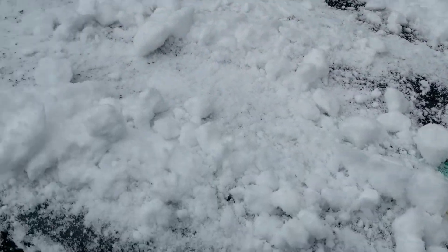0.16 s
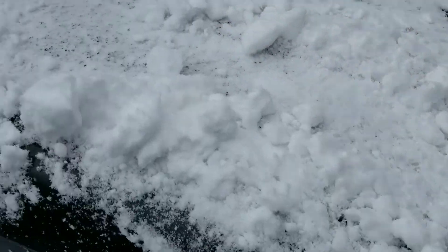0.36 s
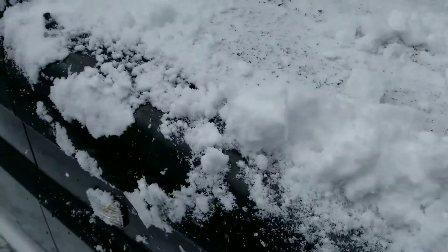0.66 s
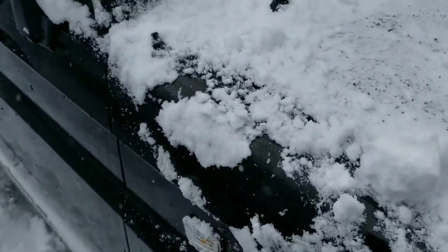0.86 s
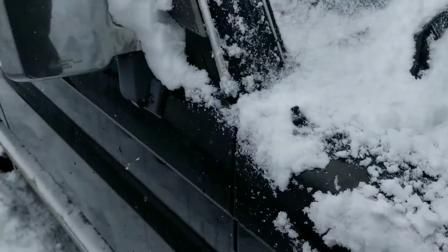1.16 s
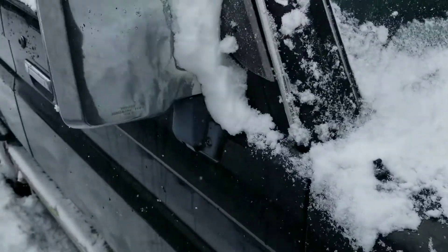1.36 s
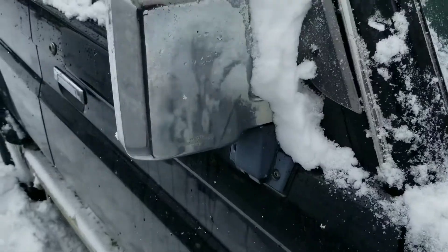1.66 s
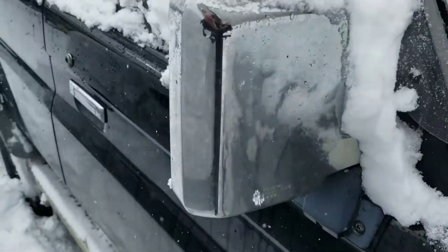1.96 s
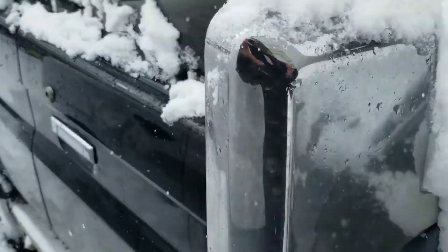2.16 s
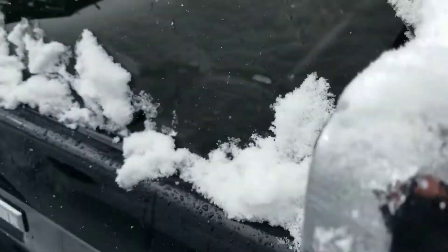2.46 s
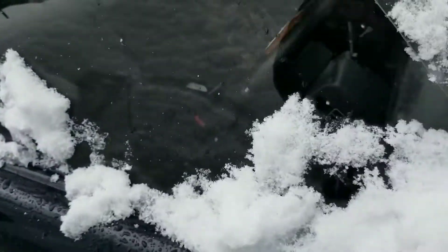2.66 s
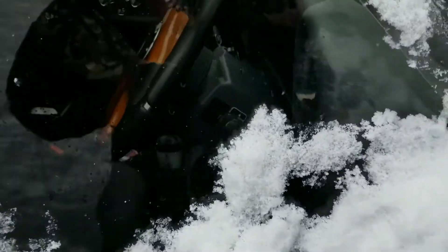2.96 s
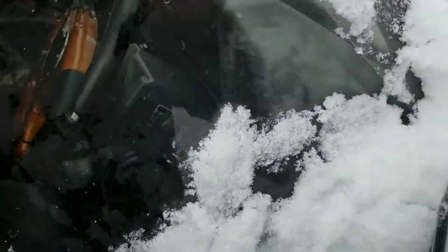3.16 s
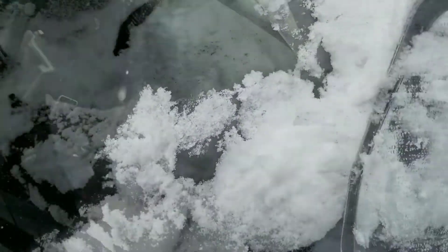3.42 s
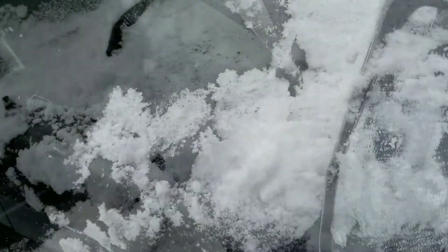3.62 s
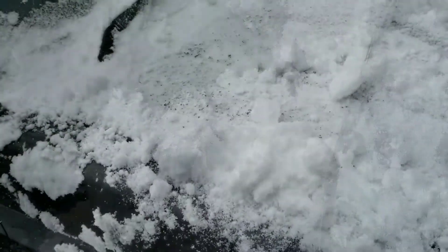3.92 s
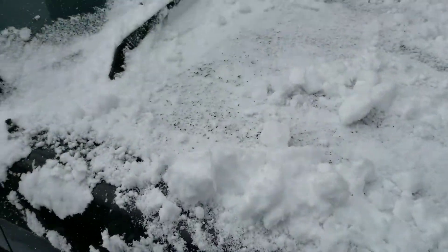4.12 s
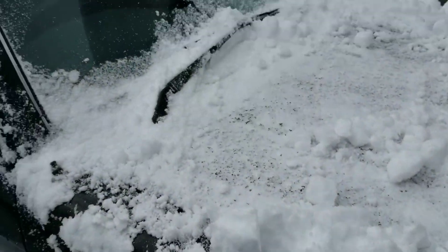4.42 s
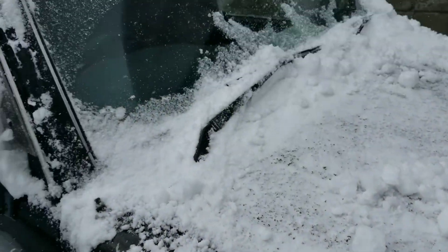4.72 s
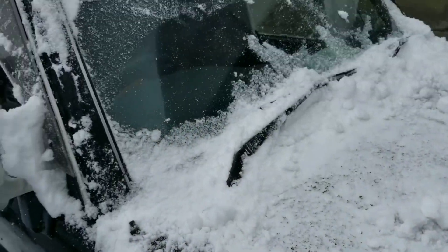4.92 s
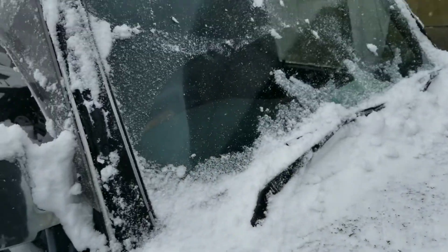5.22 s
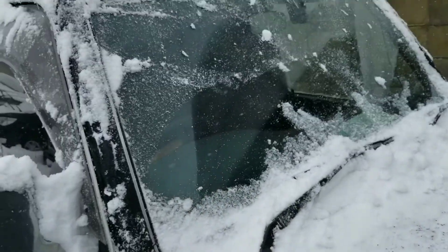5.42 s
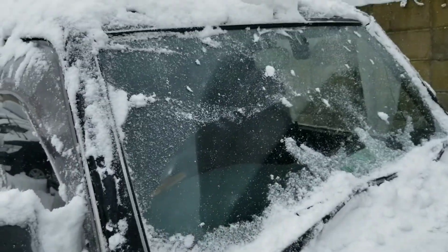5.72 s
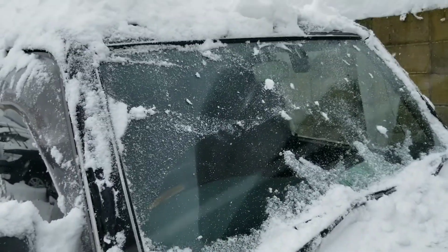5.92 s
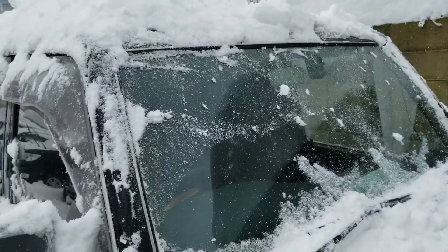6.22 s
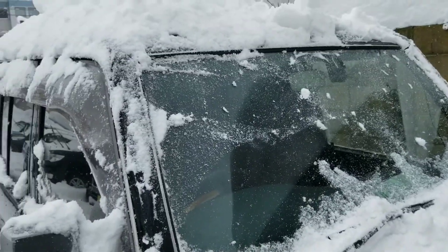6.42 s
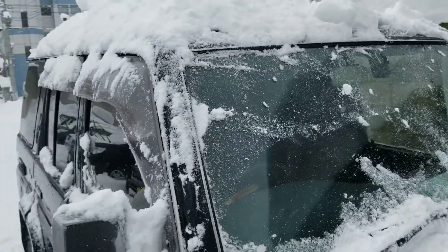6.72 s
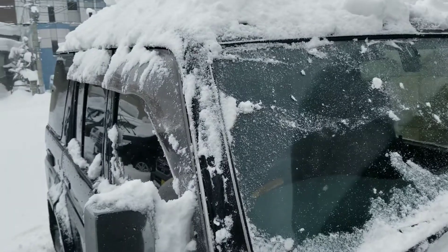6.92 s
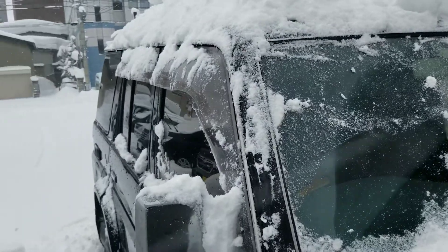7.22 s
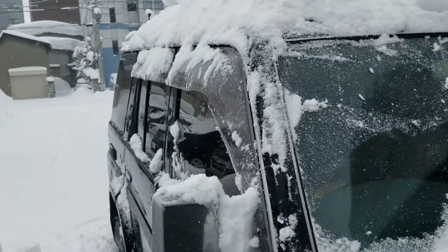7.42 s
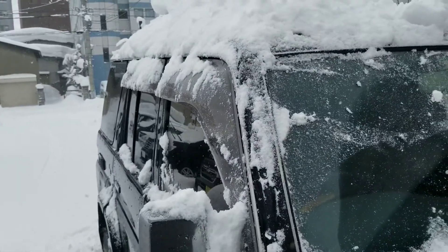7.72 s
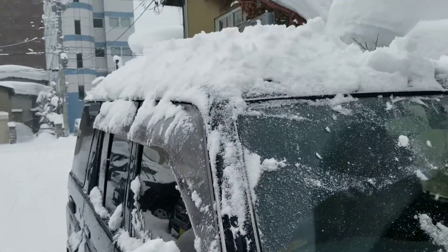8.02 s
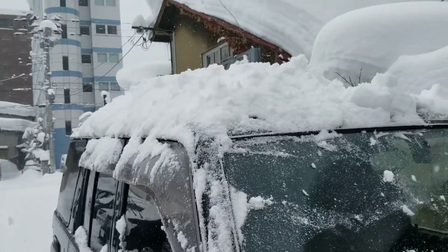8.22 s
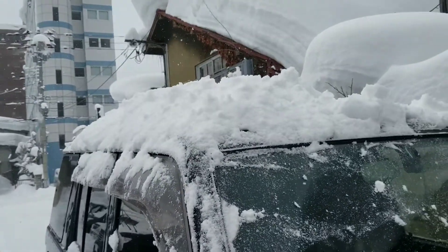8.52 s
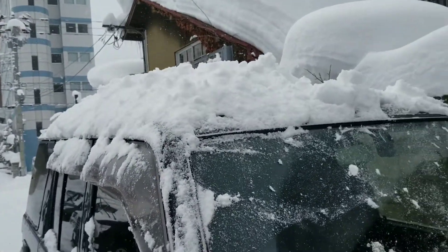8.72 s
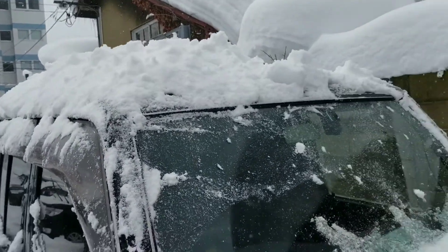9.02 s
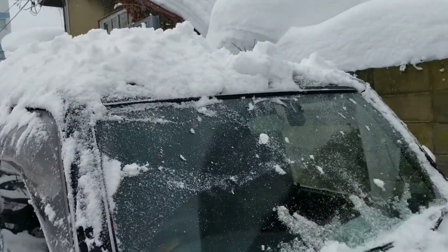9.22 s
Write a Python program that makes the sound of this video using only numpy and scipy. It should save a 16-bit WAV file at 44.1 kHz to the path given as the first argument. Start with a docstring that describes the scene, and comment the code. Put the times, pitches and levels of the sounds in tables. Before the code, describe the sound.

A four-cylinder diesel idles steadily outdoors in snow, heard through a close hand-held stereo microphone. From 0 to 1 s it is open: deep boom, about 25 firings per second, uneven metallic knocks, injector ticking and pulsing belt hiss, with small snow crunches near 0.2-0.4 s. From 1.5 to 3.5 s knock and hiss fade, leaving a blurred hollow drone; boots crunch at 2.0 s and more heavily at 3.1-3.25 s, and a sleeve swishes faintly. At 3.61 s the sound cuts for a blink, then loud finger bumps strike mainly the right until 3.8 s. Low gusts buffet both sides, dying down by 5.2 s, while the engine is muffled and its bass flutters. From 6 to 7 s it comes clear again, clattering and hissing steadily to 9.4 s with occasional harder knocks. A distant vehicle's low hum sinks in pitch, then rises around 8-9 s, beating against the boom.

```python
"""Diesel idling in deep snow

Someone walks round a four-cylinder diesel with a hand-held microphone, first along its side, then in front.
Firing harmonics make the exhaust boom, noise-rung strokes the knock, and pulsing noise the belt side's hiss.
Snow crunches as decaying rings with grit. After a short break a finger bumps the right port, gusts of
shaped noise buffet both, and the shielded engine comes clear again.
Far off, two gliding sines are the hum of another vehicle that slows and pulls away.
"""
import sys
import numpy as np
from scipy import signal
from scipy.fft import rfft, irfft, next_fast_len
from scipy.io import wavfile
from scipy.ndimage import uniform_filter1d, map_coordinates

SR = 44100
rng = np.random.default_rng(int(sys.argv[2]) if len(sys.argv) > 2 else 0)


def pcm_store(signal):
    """Save signal as 16-bit PCM."""
    levels = np.round(np.clip(np.atleast_2d(signal), -1, 1) * 32767)
    wavfile.write(sys.argv[1], SR, levels.astype(np.int16).T)


N = 413216
TIME = np.arange(N) / SR
BREAK_START, BREAK_END = 3.611, 3.632  # s
FIRING_HZ = 25.474


def from_db(db):
    """Decibels to gain."""
    return 10 ** (np.asarray(db) / 20)


def rms_one(x):
    """Scale to unit power."""
    return x / np.sqrt(np.mean(x ** 2) + 1e-20)


def in_time(rows):
    """Each column of a curve, sample by sample."""
    s, *columns = np.transpose(rows)
    return [np.interp(TIME, s, c) for c in columns]


def at_hz(points, hz):
    """Read a spectrum on a log-frequency axis."""
    f, value = np.transpose(points)
    return np.interp(np.log(np.maximum(hz, 1)), np.log(f), value)


def drift(rate):
    """Smooth random curve from knots of spread 1, with rate new knots a second."""
    knots = rng.standard_normal(2048)
    coarse = map_coordinates(knots, [TIME[::32] * rate], order=2, mode="wrap")
    return coarse.repeat(32)[:N]


def span(start, end, fade_s):
    """Gain that rises, holds at 1 from start to end, and falls."""
    outside = (TIME - np.clip(TIME, start, end)) / fade_s
    return np.exp(-np.minimum(outside ** 2, 60))


# stereo width: f/Hz, left-right likeness (1 alike, 0 unrelated, negative opposed)
LIKENESS = [(50, 0.86), (350, 0.95), (700, 0.61), (1100, 0.58), (1650, -0.84), (2200, 0.052), (3000, 0.4),
            (5000, -0.013), (15000, 0.033)]


def colour(pair, spectrum):
    """Shape two unrelated signals into stereo with the given likeness per frequency; mid rms 1."""
    size = next_fast_len(N + 4096)
    hz = np.arange(size // 2 + 1) * SR / size
    alike = np.clip(at_hz(LIKENESS, hz), -.99, .99)
    widths = [np.ones_like(hz), np.sqrt((1 - alike) / (1 + alike))]
    mid, side = irfft(rfft(pair, size) * from_db(at_hz(spectrum, hz)) * widths, size)[:, :N]
    return np.array([mid + side, mid - side]) / np.std(mid)


def swell(rows, fade_s, spectrum):
    """Coloured noise that comes and goes."""
    gain = np.sqrt(sum((from_db(db) * span(start, end, fade_s)) ** 2 for start, end, db in rows))
    return gain * colour(rng.standard_normal((2, N)), spectrum)


def thumps(rows, rise, grit_db, grit_reach):
    """Soft blows: each swells in a share of a cycle and decays 60 dB in its given cycles, with low grit."""
    out, t = np.zeros(N), TIME[:SR // 8]
    for s, db, hz, cycles in rows:
        turn = t * hz
        # grit reaches a multiple of the pitch, never above 2270 Hz
        dull = signal.butter(3, min(grit_reach * hz, 2270), fs=SR, output="sos")
        grit = from_db(grit_db) * rms_one(signal.sosfilt(dull, rng.standard_normal(len(t))))
        envelope = (1 - np.exp(-turn / rise)) ** 2 * from_db(-60 * turn / cycles)
        ring = (np.sin(2 * np.pi * turn) + grit) * envelope
        at = int(s * SR)
        out[at:at + len(t)] += from_db(db) * ring / np.abs(ring).max()
    return out


def exhaust(turn, orders, boom_db, drone_db, tone_db, middle_db=-1.0, scatter=1.09, lag=0.0903):
    """Firing harmonics: the lowest boom steadily from the pipe, higher ones waver as the body panels shake."""
    boom = from_db(boom_db) / from_db(dict(orders)[2])
    upper_power = sum(from_db(db) ** 2 for k, db in orders[8:])
    drone = from_db(drone_db + tone_db) / np.sqrt(upper_power)
    middle = np.sqrt(boom * drone) * from_db(middle_db)
    out = np.zeros(N)
    for k, db in orders:
        angle = 2 * np.pi * k * (turn - .04)
        if k <= 2:
            wave = -boom * np.sin(angle)
        else:
            level = drone if k > 8 else middle
            waver = 1 + .08 * drift(6)
            # lag in firings, scatter in radians
            wave = level * waver * np.cos(angle - 2 * np.pi * k * lag + scatter * rng.standard_normal())
        out += np.sqrt(2) * from_db(db) * wave
    return out


def pulsing(turn, depth_db, peak):
    """Gain that swells once a firing, at the given place in the cycle."""
    return rms_one(from_db(depth_db * np.cos(2 * np.pi * (turn - peak))))


def clatter(turn, cylinders_db, rise_s, t60, bed, repeat, jitter_s):
    """Each firing strikes the metal: part of the ring repeats for that cylinder, part rattles freely."""
    firing = np.floor(turn).astype(int) + 1
    age = turn % 1 / FIRING_HZ  # s since the firing
    chance = rng.standard_normal((firing.max() + 1, 2))[firing]
    cylinder = (firing - 1) % len(cylinders_db)
    strength_db = np.array(cylinders_db)[cylinder] + chance[:, 0]
    blow = from_db(strength_db - 60 * age / t60) * (1 - np.exp(-age / rise_s))
    # all cylinders share the block's ring and add a little of their own
    shared = rng.standard_normal((2, 1, 2048))
    rings = rms_one(shared + .5 * rng.standard_normal((2, len(cylinders_db), 2048)))
    place = ((age + jitter_s * chance[:, 1]) * SR).astype(int) % rings.shape[-1]
    same = rings[:, cylinder, place]
    share = np.clip(repeat, 0, 1)
    rattle = np.sqrt(share) * same + np.sqrt(1 - share) * rng.standard_normal((2, N))
    return rattle * np.hypot(rms_one(blow), bed)


def resonate(x, modes, vary_db):
    """Lift a band at each resonance; the lift drifts at the pace of the firings."""
    for hz, width, lift_db in modes:
        r = np.exp(-np.pi * width / SR)
        top = [(1 - r * r) / 2, 0, -(1 - r * r) / 2]
        bottom = [1, -2 * r * np.cos(2 * np.pi * hz / SR), r * r]
        band = signal.lfilter(top, bottom, x)
        x = x + (from_db(lift_db + vary_db * drift(FIRING_HZ)) - 1) * band
    return x


# resonances of block and covers: f/Hz, width/Hz, mean lift/dB (blows use f alone)
BLOCK_MODES = [(807, 80, 6.5), (1014, 28, 4), (1231, 37, 6), (1406, 160, 3), (1598, 130, 3.5),
               (1908, 184, 4.5), (2151, 54, 4.5), (2310, 28, 3.5), (2520, 240, 4.5)]


def ring_block(rows, rise_s, t60, spread_hz):
    """Each blow (t/s, peak/dB, f/Hz) swells into a ring of the block's modes near one pitch."""
    out, t = np.zeros((2, N + SR)), TIME[:SR // 12]
    modes = np.array(BLOCK_MODES)[:, :1]
    rings = np.sin(2 * np.pi * modes * t) * (1 - np.exp(-t / rise_s)) ** 2 * from_db(-60 * t / t60)
    for s, db, hz in rows:
        nearness = np.exp(-.5 * ((modes.T - hz) / spread_hz) ** 2)
        ring = (nearness * rng.standard_normal((2, len(modes)))) @ rings
        at = int(s * SR)
        out[:, at:at + len(t)] += from_db(db) * ring / np.abs(ring).max(axis=1, keepdims=True)
    return out[:, :N]


def pings(turn, cylinders, vary_db=1.5, wander_octaves=0.11, cover_vary_db=5.0):
    """Every ignition pings near its cylinder's pitch; the covers ring rounder after it, each time varied."""
    at = np.flatnonzero(np.diff(np.floor(turn)) > 0) + 1
    cylinder = np.floor(turn[at]).astype(int) % len(cylinders)
    db, hz, cover_db = np.array(cylinders)[cylinder].T
    chance = rng.standard_normal((len(at), 4)).T
    block_hz = hz * 2 ** (wander_octaves * chance[1])
    cover_hz = 1997 * 2 ** (wander_octaves * chance[3])
    block = zip(TIME[at], db + vary_db * chance[0], block_hz)
    covers = zip(TIME[at] + 0.001535, cover_db + cover_vary_db * chance[2], cover_hz)
    return (ring_block(block, rise_s=.0012, t60=.048, spread_hz=200),
            ring_block(covers, rise_s=.005, t60=.036, spread_hz=150))


def chuffing(turn, peak=0.14, rise_db=30, fall_db=19, bed=0.58, vary_db=3.0):
    """Hiss swells quickly towards each firing and sinks more slowly after it (dB per cycle)."""
    since = (turn - peak) % 1
    slope_db = -np.minimum(fall_db * since, rise_db * (1 - since))
    swelling = from_db(slope_db + vary_db * np.tanh(drift(FIRING_HZ)))
    return rng.standard_normal((2, N)) * np.hypot(bed, swelling)


# dull knock of the sump: f/Hz, relative level per Hz/dB
SUMP = [(350, -21), (560, 2.5), (690, -0.5), (820, -1), (920, -1.5), (1040, 3), (1150, -3.5), (1500, -35)]
# knock of the block: f/Hz, relative level per Hz/dB
KNOCK = [(500, 2.5), (800, -0.5), (1030, -5), (1140, -4.5), (1300, 3), (1450, 6), (1650, -7), (1900, -24),
         (3000, -30)]
# clatter of the injectors: f/Hz, relative level per Hz/dB
INJECTORS = [(1200, -40), (1700, -4), (1950, 0.5), (2300, 2), (2550, -0.5), (2750, -3.5), (3200, -8.5),
             (4200, -11.5), (6000, -29)]
# belt and intake hiss: f/Hz, relative level per Hz/dB
HISS = [(1760, -1), (3000, -0.5), (3870, -5), (4720, -3.5), (6610, -8), (8120, -6), (8880, -8.5),
        (10300, -8), (12500, -7.5), (14100, -11.5), (14900, -9), (15500, -18)]
# resonances in the hiss: f/Hz, width/Hz, mean lift/dB
PULLEY_MODES = [(5100, 810, 0), (8000, 330, 0), (10600, 85, 5)]


def engine(start_turn, levels, wash, orders, cylinders_db, cylinder_pings, rumble_colour,
           tone_db, rumble_db, sump_db, knock_db, ping_db, cover_db, tick_db, air_db):
    """The idling engine from one side of the car: every layer follows one firing clock."""
    turn = FIRING_HZ * TIME + start_turn + .003 * drift(5)
    boom_db, drone_db, block_db, injector_db, hiss_db = levels
    # out of sight of the engine the clean hum fades faster than the rumble
    hum_db = drone_db + 0.44 * (drone_db + 34.5)
    tones = exhaust(turn, orders, boom_db, hum_db, tone_db)
    rumble_noise = rng.standard_normal((2, N)) * pulsing(turn, depth_db=4.5, peak=0.21)
    rumble = colour(rumble_noise, rumble_colour)
    knock = clatter(turn, cylinders_db, rise_s=.005, t60=.1, bed=wash, repeat=.45, jitter_s=.00015)
    ticks = clatter(turn, np.multiply(cylinders_db, .5), rise_s=0.0028, t60=0.095, bed=wash,
                    repeat=0.35, jitter_s=0.0002)
    # the dose of fuel wanders from stroke to stroke
    ticks = ticks * from_db(1.4 * drift(14))
    knock, ticks = [resonate(part, BLOCK_MODES, vary_db=2.5) for part in (knock, ticks)]
    hiss = resonate(chuffing(turn), PULLEY_MODES, vary_db=2.5)
    ping, covers = pings(turn, cylinder_pings)
    # the sump is heard from under the car like the drone; block and injectors need a clearer path
    under_car = from_db(rumble_db) * rumble + from_db(sump_db) * colour(knock, SUMP)
    return (tones + from_db(drone_db) * under_car
            + from_db(block_db + knock_db) * colour(knock, KNOCK)
            + from_db(block_db + ping_db) * ping
            + from_db(injector_db + cover_db) * covers
            + from_db(injector_db + tick_db) * colour(ticks, INJECTORS)
            + from_db(hiss_db + air_db) * colour(hiss, HISS))


def heard(parts, name, walk_db):
    """Level in dB of one part of the engine's sound along the walk."""
    open_db, follows = parts[name]
    return open_db + follows * walk_db


# the engine bay drops out of view: t/s, treble curve level/dB, knock curve level/dB
SIDE_WALK = [(0.1, -0.5, 1.5), (0.3, -0.5, -1.5), (0.9, -0.3, -0.5), (1.7, -2, -5), (2.3, -1.5, -7.5),
             (2.8, -2.5, -13), (3.6, -0.94, -8.5)]
# engine parts by name: level in the open/dB, dB gained per dB of the walk curve
SIDE_PARTS = {"boom": (-27.5, 0.039), "drone": (-36.5, 0.38), "block": (-41.5, 1.64),
              "injectors": (-49.5, 3.57), "hiss": (-54.5, 2.26)}
# engine orders: multiple of the firing rate, relative level/dB
SIDE_ORDERS = [(1, -10.5), (2, 0.5), (3, -11.5), (4, -10), (5, -14), (6, -20), (7, -16), (8, -24.5),
               (9, -23.5), (10, -23), (11, -34), (12, -20), (13, -25.5), (14, -25), (15, -17), (16, -25),
               (17, -32), (18, -32), (19, -30.5), (20, -22), (21, -35), (22, -30), (23, -33.5), (24, -36),
               (25, -36.5), (28, -35), (31, -31)]
# cylinder strengths in firing order: relative level/dB
SIDE_CYLINDERS = [4.1, 5.3, 1.5, 4.8]
# ignition pings in firing order: relative level/dB, main f/Hz, relative level of the covers' ring/dB
SIDE_PINGS = [(-13, 1230, -7.5), (-3, 1100, -2), (-3, 1650, 1), (-1.5, 1420, -5)]
# rough part of the drone: f/Hz, relative level per Hz/dB
SIDE_RUMBLE = [(20, -26), (41, -10), (70, -5), (110, -5.5), (227, -14.5), (382, -17.5), (449, -25.5),
               (495, -20.5), (700, -34.5), (910, -62), (1540, -120)]


def engine_beside():
    """Along the side the boom holds steady while knock and hiss fade and the clatter blurs."""
    treble_db, knock_db = in_time(SIDE_WALK)
    levels = ([heard(SIDE_PARTS, name, knock_db) for name in ("boom", "drone", "block")]
              + [heard(SIDE_PARTS, name, treble_db) for name in ("injectors", "hiss")])
    # the even wash from under the car grows as the block drops out of view
    wash = 0.42 - 0.05 * knock_db
    return engine(.2, levels, wash, SIDE_ORDERS, SIDE_CYLINDERS, SIDE_PINGS, SIDE_RUMBLE,
                  tone_db=-5.0, rumble_db=3.5, sump_db=-11.0, knock_db=-5.0, ping_db=3.5,
                  cover_db=7.0, tick_db=1.0, air_db=3.5)


# the engine is shielded at first, then comes clear: t/s, openness level/dB
FRONT_WALK = [(4.2, -10.5), (4.9, -12), (5.35, -9.5), (6.0, -10), (6.3, -4), (6.9, -0.2), (8.2, 0.5),
              (9.37, 1)]
# engine parts by name: level in the open/dB, dB gained per dB of openness
FRONT_PARTS = {"boom": (-29.5, 0.77), "drone": (-41, 0.92), "block": (-49, 1), "injectors": (-52, 1.0),
               "hiss": (-56.5, 1.0)}
# engine orders: multiple of the firing rate, relative level/dB
FRONT_ORDERS = [(1, -15.5), (2, -5.5), (3, -12.5), (4, -11), (5, -15), (6, -18.5), (7, -16), (8, -27),
                (9, -18), (10, -17.5), (11, -29), (12, -17), (14, -22.5), (15, -17), (16, -30), (17, -30.5),
                (19, -17), (20, -14), (21, -51), (22, -28), (23, -26), (24, -24.5), (25, -61), (26, -41),
                (28, -35), (29, -38), (30, -29), (31, -27.5), (32, -36)]
# cylinder strengths in firing order: relative level/dB
FRONT_CYLINDERS = [6, 6.5, 7.5, 8]
# ignition pings in firing order: relative level/dB, main f/Hz, relative level of the covers' ring/dB
FRONT_PINGS = [(0.56, 1600, 0), (0.35, 1530, -4.5), (3.9, 1370, -13.5), (0.5, 1170, -5.5)]
# rough part of the drone: f/Hz, relative level per Hz/dB
FRONT_RUMBLE = [(41, -16), (70, -8.5), (182, -13.5), (206, -20.5), (378, -12.5), (449, -21), (495, -17),
                (700, -33.5), (910, -71), (1540, -120)]
# depth in the open, added depth per dB of shielding, changes per second
FLUTTER_DB, FLUTTER_GROWTH, FLUTTER_PER_S = 0.9, 0.14, 14
BOOM_GROWTH_DB_PER_S = 1.4


def engine_in_front():
    """In front every part follows the openness, the pings less than the block, and the boom flutters."""
    open_db, = in_time(FRONT_WALK)
    names = ("boom", "drone", "block", "injectors", "hiss")
    boom_db, *others = [heard(FRONT_PARTS, name, open_db) for name in names]
    flutter_db = (FLUTTER_DB - FLUTTER_GROWTH * open_db) * drift(FLUTTER_PER_S)
    # the boom also grows steadily as the microphone comes round the bonnet
    boom_db = boom_db + flutter_db - BOOM_GROWTH_DB_PER_S * (TIME[-1] - TIME)
    return engine(-.31, [boom_db, *others], 0.52, FRONT_ORDERS, FRONT_CYLINDERS, FRONT_PINGS, FRONT_RUMBLE,
                  tone_db=-0.5, rumble_db=1.0, sump_db=-9.5, knock_db=-4.0, ping_db=4.5 - 0.1 * open_db,
                  cover_db=10.5, tick_db=-2.0, air_db=3.0)


# firings that knock harder: t/s, peak level/dB, main f/Hz
HARD_KNOCKS = [(0.0317, -30, 1335), (0.188, -27.5, 1370), (0.2677, -29, 1480), (0.345, -33, 1320),
               (0.4239, -36, 1410), (0.5027, -30.5, 1465), (0.5806, -32, 1430), (0.66, -33, 1420),
               (0.7384, -35, 1240), (0.7785, -29, 1240), (0.8959, -33, 2300), (0.935, -33, 1340),
               (1.13, -42, 1610), (1.287, -40, 1370), (2.236, -36.5, 1940), (2.431, -37, 1980),
               (3.055, -37, 1980), (3.254, -56, 2050), (3.53, -41, 1960), (3.899, -40, 1410),
               (4.017, -45, 1400), (4.333, -41, 1400), (4.45, -50, 1512), (4.7235, -43, 1630),
               (5.081, -41.5, 1980), (5.1956, -41, 1940), (5.547, -47, 1490), (5.704, -46, 1490),
               (6.529, -40, 1400), (6.7645, -31, 1960), (7.435, -36, 1590), (8.18, -43, 1930),
               (8.336, -33, 1910), (8.8456, -30.5, 1900), (9.002, -36, 1570), (9.1983, -32, 1215)]


def hard_knocks():
    """Single harder blows ring the block's modes close to one pitch."""
    return ring_block(HARD_KNOCKS, rise_s=.0012, t60=.048, spread_hz=106)


# the drone swells at one pitch: start t/s, end t/s, f/Hz, level/dB
HUM_SWELLS = [(7.031, 7.108, 276, -44), (7.35, 7.419, 378, -47.5), (7.6, 7.72, 372, -46.5)]


def hum_swells():
    """Single low tones rise out of the drone and sink back."""
    return sum(np.sqrt(2) * from_db(db) * span(start, end, fade_s=0.046) * np.sin(2 * np.pi * hz * TIME)
               for start, end, hz, db in HUM_SWELLS)


# passing the hollow by the door: start t/s, end t/s, level/dB
HOLLOW = [(2.1, 3.45, -40)]
# its spectrum: f/Hz, relative level per Hz/dB
HOLLOW_COLOUR = [(100, -54), (200, -10), (275, 3), (340, -3.5), (480, -13.5), (900, -35), (1800, -34),
                 (2400, -36), (2800, -47), (4000, -44)]


def door_hollow():
    """Engine noise gathers in the hollow by the door as the microphone passes: a swell of shaped noise."""
    return swell(HOLLOW, 0.25, HOLLOW_COLOUR)


# packed snow giving under a boot: t/s, peak level/dB, ring f/Hz, cycles to fall 60 dB
STEPS = [(0.203, -24, 172, 26), (0.225, -23.5, 335, 28), (0.389, -26, 318, 3), (2.0148, -24, 790, 7.5),
         (2.0152, -40, 1740, 8), (2.0432, -25.5, 740, 4.5), (2.0487, -37, 720, 6), (2.0555, -32, 760, 6.5),
         (2.078, -32, 860, 6), (2.082, -40, 2250, 18), (2.0855, -31, 740, 4.5), (2.092, -34, 260, 4),
         (2.458, -28, 2290, 3.4), (2.855, -27, 254, 2.3), (3.077, -25, 270, 3.4), (3.1105, -23.5, 775, 3),
         (3.113, -20, 296, 3.9), (3.141, -19.5, 243, 5.2), (3.1445, -28, 520, 3.6), (3.2055, -18, 227, 2),
         (3.23, -17.5, 184, 2.8), (3.24, -16.5, 150, 2.8)]
# the sole scuffs between crunches: start t/s, end t/s, level/dB
SCUFFS = [(2.04, 2.06, -46), (3.11, 3.15, -49)]
# scuff spectrum: f/Hz, relative level per Hz/dB
SCUFF_COLOUR = [(250, -8), (550, 0), (950, 8), (1400, -21), (3000, -33)]


def boots():
    """Snow gives way in short gritty rings, and the sole's scuffs are swells of noise."""
    crunches = thumps(STEPS, rise=0.23, grit_db=-15.5, grit_reach=0.93)
    return crunches + swell(SCUFFS, 0.022, SCUFF_COLOUR)


# bumps of finger and air: t/s, peak level on the louder port/dB, ring f/Hz, cycles to fall 60 dB,
# left minus right level/dB
KICKS = [(3.6345, 1, 133, 1.8, -22), (3.645, -1.5, 270, 1.1, -32), (3.658, -18, 130, 2.6, 8),
         (3.677, -9, 130, 2.5, -18), (3.685, -11, 105, 4, -22), (3.701, -11, 170, 2.1, -22),
         (3.7155, -18, 200, 2.7, -20), (3.7336, -10.5, 372, 5.3, -19), (3.748, -14.5, 620, 3.3, -24),
         (3.7515, -14, 477, 3, -22), (3.762, 2, 159, 3, -22), (3.7625, -22, 600, 6.1, -26),
         (3.77, -4.5, 614, 9.4, -35), (3.7705, -13, 940, 9.8, -28), (3.7712, -11, 1380, 16, -30),
         (3.7718, 4, 270, 1.9, -37), (3.772, -29, 1880, 8.1, -30), (3.7755, -12, 218, 6.5, -24),
         (3.783, -11.5, 200, 4, -18), (3.792, -14.5, 257, 5.6, 9), (3.795, -16, 650, 0.74, -24),
         (3.797, -9, 150, 3.6, -9), (3.81, -21, 426, 11, -17), (3.852, -27, 700, 3.5, -21),
         (3.913, -22, 320, 4.4, -5), (4.021, -25.5, 146, 7, 0), (4.08, -22, 102.7, 8.5, -16),
         (4.15, -25, 69.6, 6, 4), (4.491, -26, 75, 3, -1), (4.556, -26.5, 151, 3.2, -5),
         (5.175, -46, 86, 4.3, 2), (5.225, -32, 62.3, 4.3, 3)]
# a finger rubs over the right port: start t/s, end t/s, level/dB
RUBS = [(3.704, 3.717, -46), (3.761, 3.774, -33)]
# rub spectrum: f/Hz, relative level per Hz/dB
RUB_COLOUR = [(400, -8), (750, 8.5), (1500, 1), (2200, -14), (3200, -24), (6000, -52)]


def handling():
    """Bumps land unevenly on the two ports; the finger rubs only on the right one."""
    kicks = np.zeros((2, N))
    for *kick, pan in KICKS:
        ports = from_db([[min(pan, 0)], [min(-pan, 0)]])
        kicks += thumps([kick], rise=0.2, grit_db=-11.0, grit_reach=1.58) * ports
    return kicks + swell(RUBS, 0.003, RUB_COLOUR) * [[0], [1]]


# gusts on the ports: start t/s, end t/s, left level/dB, right level/dB
GUSTS = [(3.656, 3.725, -26, -19), (3.768, 3.782, -16.5, -16), (3.838, 3.869, -28, -45),
         (3.924, 3.96, -36, -27), (4.024, 4.113, -34, -45), (4.155, 4.206, -42, -47),
         (4.323, 4.42, -45, -41), (4.5, 4.68, -49, -48), (4.767, 4.963, -44, -46), (5.16, 5.214, -37, -48)]
# wind spectrum: f/Hz, relative level per Hz/dB
GUST_COLOUR = [(25, -10), (60, 13.5), (100, 10), (160, 4), (230, -2.5), (400, -11.5), (800, -34),
               (2000, -43), (5000, -56)]
BREEZE_DB, BREEZE_FADE_DB_PER_S = -40.5, 1.8


def buffeting():
    """Gusts ride on a breeze that starts after the break and dies down; each port has its own eddies."""
    breeze = from_db(BREEZE_DB - BREEZE_FADE_DB_PER_S * (TIME - BREAK_END))
    gusts = sum(from_db([[left], [right]]) * span(start, end, fade_s=0.021)
                for start, end, left, right in GUSTS)
    eddies = np.array([colour(rng.standard_normal((2, N)), GUST_COLOUR)[0] for port in range(2)])
    return eddies * np.hypot(breeze, gusts) * (TIME > BREAK_END)


# a sleeve swishes near the microphone: start t/s, end t/s, level/dB
SLEEVE = [(3.0, 3.25, -73), (3.36, 3.55, -58), (3.7, 3.77, -70)]
# swish spectrum: f/Hz, relative level per Hz/dB
SLEEVE_COLOUR = [(500, -38), (4000, 16), (9000, 6), (12500, 16), (15500, 2)]


def sleeve():
    """Cloth friction as brief swells of bright noise."""
    return swell(SLEEVE, 0.081, SLEEVE_COLOUR)


# another vehicle slows and pulls away: t/s, mean firing f/Hz, hum level/dB, octave level/dB
FAR_VEHICLE = [(5.6, 49.94, -50, -68), (6.2, 46.8, -44, -43), (7.0, 45.4, -50, -65), (7.4, 43.17, -48, -49),
               (7.75, 41.9, -44, -57), (8.3, 45.76, -33, -48), (8.9, 48.85, -35, -38),
               (9.37, 50.7, -55, -59)]


def far_vehicle():
    """Only the lowest hum of a distant engine carries over the snow; it beats against the boom."""
    hz, hum_db, octave_db = in_time(FAR_VEHICLE)
    angle = 2 * np.pi * np.cumsum(hz + .3 * drift(6)) / SR
    hum = from_db(hum_db) * rms_one(np.sin(angle))
    return hum + from_db(octave_db) * rms_one(np.sin(2 * angle))


# short bass changes, mostly dips: start t/s, end t/s, left level/dB, right level/dB
BASS_DIPS = [(3.85, 3.882, 2.5, -18), (4.094, 4.113, -20, -3), (4.594, 4.603, -16, 5),
             (4.818, 5.037, 0, -20), (4.982, 4.996, -4, -2), (5.07, 5.147, -3, -9), (5.303, 5.324, -3, -14),
             (5.903, 5.927, -2, -23), (6.035, 6.054, -6, -10), (6.37, 6.4, -1.5, -13),
             (6.564, 6.593, -1, -5)]


def bass_dips(x):
    """The bass sinks for moments, mostly on the right, while the rest carries on."""
    bass = signal.sosfiltfilt(signal.butter(2, 330, fs=SR, output="sos"), x)
    dip_db = sum(np.array([[left], [right]]) * span(start, end, fade_s=0.018)
                 for start, end, left, right in BASS_DIPS)
    return x + (from_db(dip_db) - 1) * bass


def scene():
    """Beside the car, then in front of it, with far traffic, boots, sleeve and air on top."""
    idling = np.where(TIME < BREAK_START, engine_beside(), engine_in_front())
    car = idling + hard_knocks() + hum_swells() + door_hollow()
    # the right port is a little nearer the engine: the left lags 5 samples
    car = np.array([np.roll(car[0], 5), car[1]])
    return bass_dips(car + boots() + handling() + buffeting() + sleeve() + far_vehicle())


def record(dry):
    """The sound breaks off briefly, peaks overload softly, and the top is cut above 15.6 kHz."""
    running = uniform_filter1d(((TIME < BREAK_START) | (TIME > BREAK_END)) * 1.0, size=96)
    limited = 1.178 * np.tanh(dry * running / 1.214)
    return signal.sosfilt(signal.ellip(12, .1, 80, 15600, fs=SR, output="sos"), limited)


dry = scene()
out = record(dry)
pcm_store(out)
```